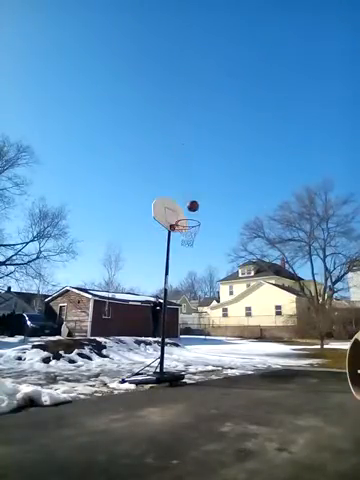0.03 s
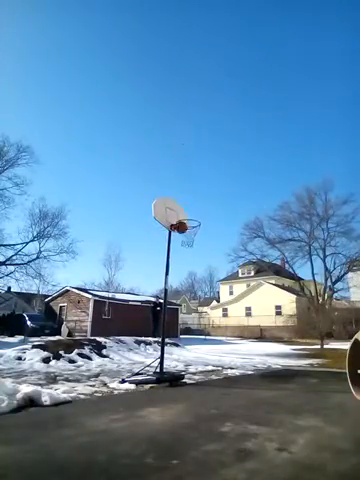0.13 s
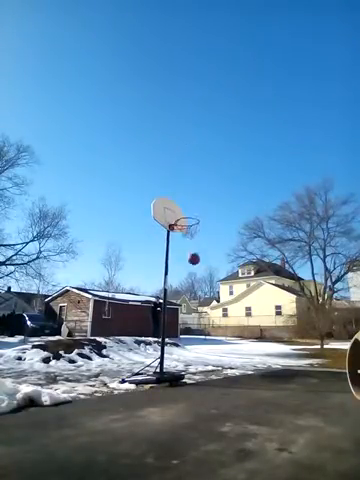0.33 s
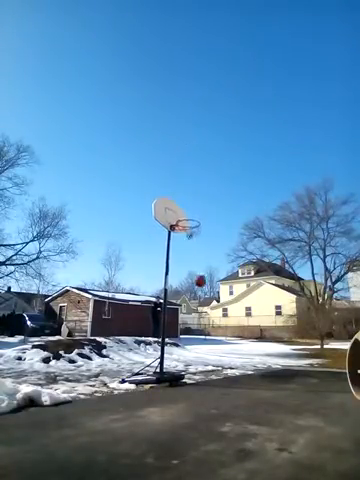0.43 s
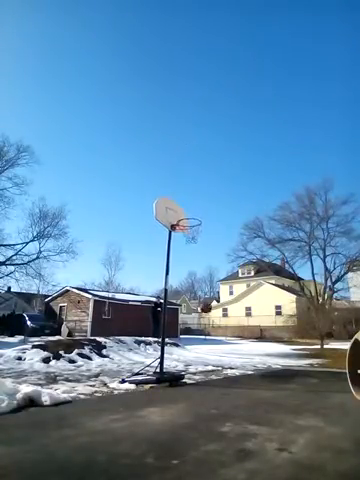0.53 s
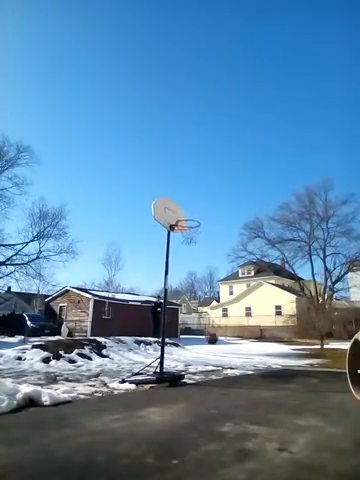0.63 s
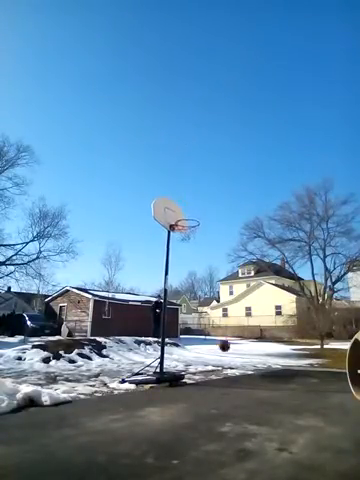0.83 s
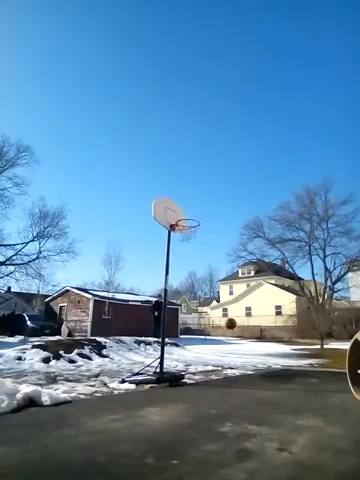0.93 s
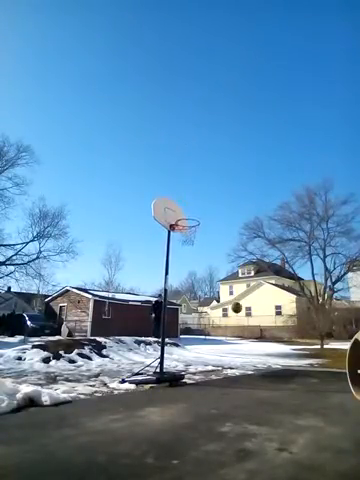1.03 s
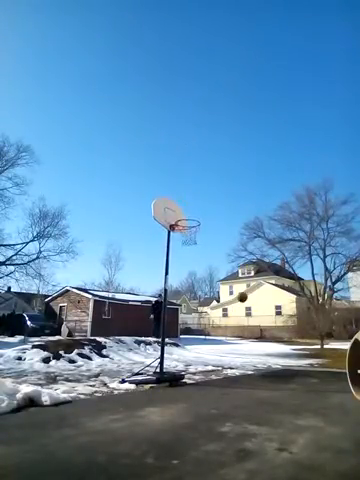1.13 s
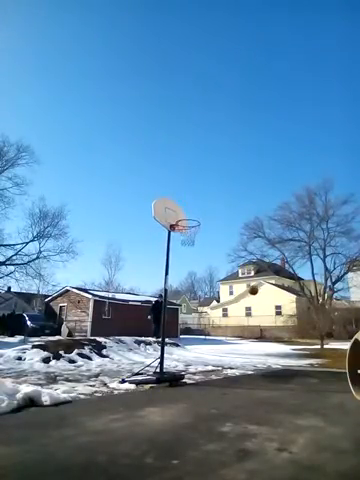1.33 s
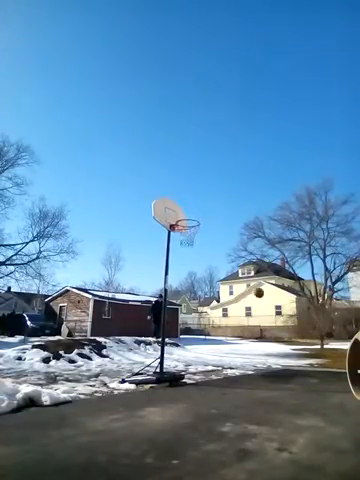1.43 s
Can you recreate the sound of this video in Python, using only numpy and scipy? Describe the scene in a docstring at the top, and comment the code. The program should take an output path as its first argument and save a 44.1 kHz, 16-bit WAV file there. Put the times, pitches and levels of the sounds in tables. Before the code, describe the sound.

A basketball smacks the rim of an outdoor hoop at about 0.2 seconds. The loose frame rattles, the pole shudders low, and the chain net jingles brightly, its clinks thinning after 0.6 seconds. At about 0.9 seconds the ball bounces once on asphalt with a sharp, slightly hollow thump. Light clinks and rattles fade by around 1.3 seconds, with a faint echo and a quiet outdoor rumble underneath.

```python
"""Basketball through a chain net

A basketball smacks the rim of a portable driveway hoop and whips the chain net. The steel links
clink in thinning bunches while the loose frame rattles and the pole shudders. The ball bounces
once on the asphalt, ringing the air inside it. Nearby buildings give a faint echo, and a quiet
outdoor rumble lies under it all."""
import sys
import numpy as np
from scipy import signal
from scipy.fft import rfft, irfft
from scipy.io import wavfile
from scipy.ndimage import uniform_filter1d, minimum_filter1d

SR = 44100
rng = np.random.default_rng(int(sys.argv[2]) if len(sys.argv) > 2 else 0)


def unload_audio(sound):
    """Save the sound as a 16-bit wav file, at the path given as the first command line argument."""
    columns = np.transpose(np.atleast_2d(sound))
    # keep every value between -1 and 1, then stretch to whole-number steps
    steps = np.round(np.clip(columns, -1, 1) * 32767)
    wavfile.write(sys.argv[1], SR, steps.astype(np.int16))


N = 66150
T = np.arange(N) / SR

# tone of the outdoor bed: f/Hz, level/dB
AIR_EQ = [(20, -13), (45, -17), (85, -2.5), (170, -9), (300, -17), (700, -21.5), (1500, -30.5),
          (3800, -33.5), (5000, -24.5), (6400, -29), (8000, -53), (13000, -51), (15000, -38), (16000, -84)]
# the hanging net stirring: t/s, level/dB, rise/s, fade/s
STIRS = [(.06, -58.5, 0.064, 0.11), (.27, -21.5, 0.0077, 0.053), (0.436, -24, 0.031, 0.0049),
         (1.151, -44.5, 0.031, 0.15), (1.34, -45.5, 0.044, 0.023)]
# tone of link touching link: f/Hz, level/dB
LINK_EQ = [(100, -31), (1500, -27.5), (3000, -21.5), (4000, -16.5), (4600, -6.5), (5150, 1.5), (5900, -6.5),
           (6500, -0.5), (6950, -13.5), (7500, -24.5), (9000, -37.5), (12000, -56.5), (16000, -57)]
# the pole shuddering: t/s, level/dB, rise/s, fade/s
SHUDDERS = [(0.209, -36, 0.014, 0.054), (0.273, -32, 0.023, 0.029), (0.331, -41, 0.014, 0.24),
            (0.81, -41, 0.0091, 0.029), (.94, -40.5, 0.06, 0.094)]
# tone of the pole: f/Hz, level/dB
POLE_EQ = [(20, -20), (50, -11), (85, 4), (130, 3.5), (200, 3.5), (320, -21.5), (1000, -29), (16000, -80)]
# the ball's skin slapping: t/s, level/dB, fade/s, treble tilt/dB
SLAPS = [(0.2189, -10, 0.0013, .5), (0.8755, -8.5, 0.0012, 5), (0.8845, -17.5, 0.0022, -4)]
# tone of the skin: f/Hz, level/dB
SKIN_EQ = [(60, 0), (300, 7.5), (750, 2), (1900, 0), (2400, -9.5), (3200, -1), (4000, -5.5), (5000, 4),
           (6700, 3.5), (7600, -25.5), (16000, -60)]
# the ball squashing on the rim, then on asphalt: t/s, level/dB, final f/Hz, rise and fade/s
THUMPS = [(0.22, -26, 70, 0.0076), (0.877, -14, 86, 0.0043)]
# modes of the air inside the ball: f/Hz, level/dB, t60/s
CAVITY_MODES = [(256, -24, 0.05), (339, -28, 0.05), (430, -29, .075), (1035, -27, .05), (1900, -26, .028)]
# bunches of links clashing: t/s, relative level/dB, ring f/Hz
CLINKS = [(0.2261, -6, 5800), (.2312, -4, 6400), (0.236, -12.5, 6130), (.2435, -11, 5210),
          (.2534, -19, 5020), (0.265, -14, 5260), (.2818, -11.5, 5800), (.287, -11, 5700),
          (.2945, -9, 5480), (.302, -10, 5600), (0.3287, -13.5, 5130), (0.3631, -13, 6100),
          (.3815, -6.5, 6480), (.3918, -11, 5170), (.451, -16, 5430), (.4664, -10, 5230),
          (0.5306, -16, 5020), (0.567, -19.5, 5030), (0.574, -16, 6800), (0.581, -11.5, 5000),
          (.5923, -18.5, 4550), (.628, -24, 6200), (.7335, -22, 6400), (0.7439, -13, 6500),
          (.812, -19, 6700), (0.8157, -12, 5550), (0.8624, -16, 5000), (0.9382, -17, 6510),
          (.9886, -26.5, 5920), (1.0131, -26.5, 4850), (1.0791, -21, 5700), (1.1401, -27, 4880),
          (1.162, -19, 5030), (1.221, -29, 6480), (1.2476, -21, 4710)]
# one taut link struck and ringing freely: t/s, peak level/dB, f/Hz, t60/s, hardness/(dB per octave)
STRIKES = [(0.2273, -6.5, 5470, 0.027, 1.5), (.2995, -10, 5073, 0.1, -2.5), (.312, -12, 5185, 0.038, -35),
           (.368, -10, 5590, 0.019, -19), (.447, -20.5, 5240, 0.07, -10), (.4585, -17.5, 5200, 0.033, 1),
           (.479, -15, 5150, 0.055, -9), (0.535, -11, 5170, 0.011, 4.5), (.636, -18, 5210, 0.022, -31.5),
           (0.6413, -12, 5190, 0.025, -6.5), (.72, -17, 5050, .028, -8)]
# partials of one link: multiple of its pitch, level/dB
LINK_MODES = [(1, 0), (1.245, -5), (1.49, -26), (1.76, -33), (1.94, -36), (2.41, -36), (2.9, -47)]
# lasting ring of the steel: f/Hz, relative level/dB
STEEL_MODES = [(3630, -12), (3835, -14), (4675, -10), (4807, -3), (4894, -4), (5126, 1), (5355, -4),
               (5530, -7), (5660, -6), (6059, -6), (6362, -6), (6512, -5)]
# the frame rattling in its joints: t/s, level/dB, rise/s, fade/s, treble tilt/dB
RATTLES = [(0.228, -10, 0.0004, 0.0081, 8), (.238, -27, 0.0029, 0.11, -1), (.283, -30, 0.0061, 0.019, -24),
           (0.369, -30, 0.0069, 0.064, 2), (.385, -28, 0.02, 0.024, -1), (.462, -32.5, 0.022, 0.025, 1.5),
           (0.532, -35, 0.0015, 0.084, 0.5), (0.573, -27, 0.019, 0.02, 4), (.630, -41.5, .01, 0.032, -5),
           (.722, -35.5, 0.0069, 0.045, -0.5), (.812, -32.5, 0.0031, 0.04, -1),
           (.938, -42, 0.0031, 0.14, -1), (1.078, -44, 0.0028, 0.045, -0.5),
           (1.138, -43, 0.0023, 0.13, -3.5), (1.2, -46.5, 0.004, 0.06, -9), (1.245, -36, 0.0036, 0.025, -5),
           (1.295, -42.5, 0.0064, 0.017, -18.5)]
# tone of the frame: f/Hz, level/dB
FRAME_EQ = [(60, -16), (150, -13.5), (450, 1.5), (800, 0), (1050, -5), (1450, -0.5), (2000, -9.5),
            (2750, 0), (3400, 1), (3560, -17), (3820, -1), (4000, -4.5), (4300, 0), (5000, -3), (6700, -3),
            (7600, -23), (16000, -59.5)]
# backboard resonances: f/Hz
BOARD_MODES = [243.7, 476, 650.7, 863, 1366]
# parts of the hoop that ring when knocked: t/s, f/Hz, level/dB, t60/s
PINGS = [(0.227, 2480, -14, 0.041), (0.229, 2860, -17, 0.024), (.749, 625, -29, 0.12),
         (.816, 253, -25.5, 0.048), (.816, 477, -29, 0.065), (0.812, 1705, -23, 0.04),
         (.814, 2140, -25.5, 0.07)]


def amp(db):
    """Decibels to gain."""
    return 10 ** (np.asarray(db) / 20)


def unit(x):
    """Scales to an energy of one."""
    return x / np.sqrt(np.sum(x ** 2) + 1e-20)


def add(mix, s, sound):
    """Drops a sound into the mix at s seconds."""
    part = mix[max(0, round(s * SR)):][:len(sound)]
    part += sound[:len(part)]


def layer(main, extra, db):
    """Layers extra onto main, its energy set in dB relative to main."""
    return main + amp(db) * np.linalg.norm(main) * unit(extra)


def through(x, response):
    """Convolves, keeping the length."""
    return signal.fftconvolve(x, response)[:len(x)]


def colour(eq, tilt_db=0, size=4096):
    """Minimum-phase response of energy one for an EQ curve, tilted about 1500 Hz."""
    hz = np.fft.rfftfreq(size, 1 / SR) + 1
    eq_hz, eq_db = np.transpose(eq)
    db = np.interp(np.log(hz), np.log(eq_hz), eq_db) + tilt_db * np.tanh(np.log(hz / 1500))
    cepstrum = irfft(np.log(amp(db)))
    cepstrum[1:size // 2] *= 2
    cepstrum[size // 2 + 1:] = 0
    return unit(irfft(np.exp(rfft(cepstrum))))


def mode(hz, t60, t=T):
    """One dying sine."""
    return np.sin(2 * np.pi * hz * t) * np.exp(-np.log(1000) * t / t60)


def swell(rise, fade, t=T):
    """Straight attack, then exponential fade."""
    return np.minimum(t / rise, 1) * np.exp(-np.maximum(t - rise, 0) / fade)


def contacts(per_s, size=N):
    """Random tiny impacts with a mean power of one."""
    return rng.standard_normal(size) * (rng.random(size) < per_s / SR) * np.sqrt(SR / per_s)


def outdoor_air(level_db=-53):
    """A steady bed of low rumble with a trace of hiss."""
    return amp(level_db) * through(rng.standard_normal(N), colour(AIR_EQ))


def net_stir():
    """Hanging links brush each other in swells of light touches."""
    out, link = np.zeros(N), colour(LINK_EQ)
    for s, db, rise, fade in STIRS:
        add(out, s, amp(db) * through(contacts(per_s=1800) * swell(rise, fade), link))
    return out


def pole_shudder():
    """The pole and its base shake, giving the low end."""
    out, pole = np.zeros(N), colour(POLE_EQ)
    for s, db, rise, fade in SHUDDERS:
        add(out, s, amp(db) * through(contacts(per_s=2000), pole) * swell(rise, fade))
    return out


def ball_hits():
    """Skin slap over a short thump, on rim and asphalt; the ground bounce rings the air inside."""
    out = np.zeros(N)
    for s, db, fade, tilt_db in SLAPS:
        grit = unit(rng.standard_normal(N) * np.exp(-T / fade))
        grit[0] += .7  # a hard click on the attack
        slap = unit(through(grit, colour(SKIN_EQ, tilt_db)))
        add(out, s, amp(db) * np.sqrt(fade * SR / 2) * slap)
    for s, db, hz, fade in THUMPS:
        age = T / fade
        turns = np.cumsum(hz * (1 + np.exp(-age / 2))) / SR  # falls an octave as the ball relaxes
        add(out, s, -amp(db) * age * np.exp(1 - age) * np.sin(2 * np.pi * turns))
    bounce_s = THUMPS[-1][0]
    add(out, bounce_s, sum(amp(db) * mode(hz, t60) for hz, db, t60 in CAVITY_MODES))
    return out


def chain_net(attack_s=.0012, clink_gain_db=14.5):
    """Links clash in bunches or ring singly; each hit jostles its neighbours and sets the steel singing."""
    out, t, link = np.zeros(N), T[:N // 6], colour(LINK_EQ)

    def chatter():
        """Links meet in a brief burst of tiny impacts."""
        return contacts(per_s=7700, size=len(t)) * swell(attack_s, fade=.003, t=t)

    def jostled(clink):
        """A clink trailed by the lighter touches of its neighbours."""
        touches = contacts(per_s=1500, size=len(t)) * swell(rise=.0056, fade=.011, t=t)
        return layer(clink, through(touches, link), db=-5)

    for s, db, hz in CLINKS:
        tick = unit(through(chatter(), link))
        ring = through(tick, mode(hz, t60=.022, t=t))
        clink = unit(layer(tick, ring, db=-5))
        add(out, s, amp(db + clink_gain_db) * jostled(clink))
    attack = np.minimum(t / attack_s, 1)
    for s, db, hz, t60, hardness_db in STRIKES:
        hit, ring = chatter(), np.zeros(len(t))
        for ratio, mode_db in LINK_MODES:
            partial = through(hit, attack * mode(hz * ratio, t60 / ratio ** 2, t))
            ring += amp(mode_db + hardness_db * np.log2(ratio)) * unit(partial)
        add(out, s, amp(db) * jostled(ring / abs(ring).max()))
    shimmer = np.zeros(N)
    for hz, db in STEEL_MODES:
        t60 = .48 * (5000 / hz) ** 2  # high modes die sooner
        shimmer += amp(db) * unit(through(out, mode(hz, t60)))
    return layer(out, shimmer, db=-12.5)


def frame_rattle(ping_attack_s=.0087):
    """Dense knocks in the loose joints drive the backboard; knocked parts ping and the rim rings on."""
    rattle = np.zeros(N)
    for s, db, rise, fade, tilt_db in RATTLES:
        knocks = contacts(per_s=5000, size=N // 2) * swell(rise, fade, T[:N // 2])
        add(rattle, s, amp(db) * through(knocks, colour(FRAME_EQ, tilt_db)))
    board = sum(unit(through(rattle, mode(hz, t60=.33))) for hz in BOARD_MODES)
    out = layer(rattle, board, db=-16)
    for s, hz, db, t60 in PINGS:
        add(out, s, amp(db) * mode(hz, t60) * np.minimum(T / ping_attack_s, 1))
    add(out, s=.815, sound=amp(-54) * mode(hz=2203, t60=3))  # the rim's faint, long tail
    return out


def yard_echo(x, predelay_s=.02, t60=.24, tail_db=-15, wall_s=.153, wall_db=-23, wall_cutoff_hz=250):
    """The garden scatters a short, faint tail; a house wall sends one dull slapback."""
    tail = unit(contacts(per_s=2000) * (T > predelay_s) * np.exp(-np.log(1000) * T / t60))
    out = amp(tail_db) * through(x, tail)
    slapback = signal.lfilter(*signal.butter(1, wall_cutoff_hz, fs=SR), x)
    add(out, wall_s, amp(wall_db) * slapback)
    return out


def scene():
    """Mono mix of hoop and ball with their echo, over the outdoor bed."""
    action = chain_net() + net_stir() + frame_rattle() + pole_shudder() + ball_hits()
    return (action + yard_echo(action) + outdoor_air())[None]


def record(dry, ceiling=.85, cutoff_hz=15800):
    """A fast peak limiter, then a steep low-pass that trims the very top."""
    gain = ceiling / np.maximum(abs(dry), ceiling)
    smooth_gain = uniform_filter1d(minimum_filter1d(gain, size=129), size=129)
    lowpass = signal.firwin(511, cutoff_hz, window=("kaiser", 9), fs=SR)
    return signal.oaconvolve(dry * smooth_gain, lowpass[None], "same")


dry = scene()
out = record(dry)
unload_audio(out)
```